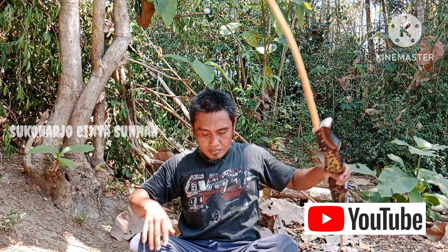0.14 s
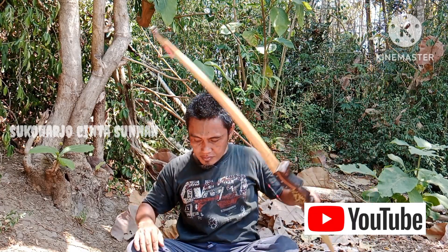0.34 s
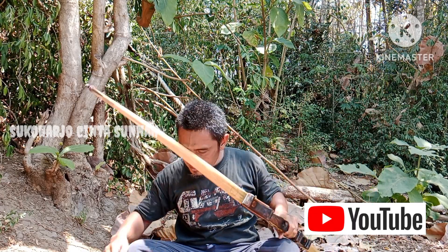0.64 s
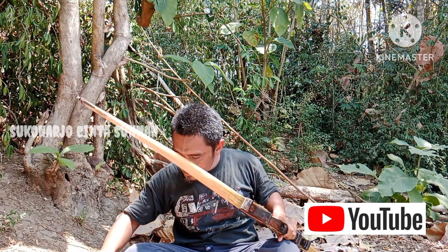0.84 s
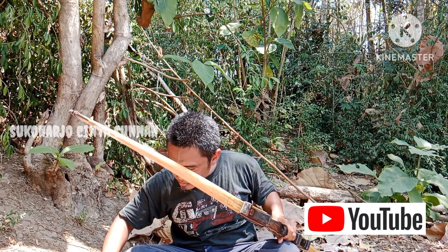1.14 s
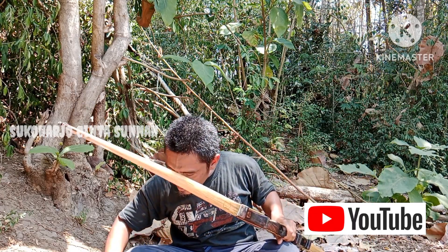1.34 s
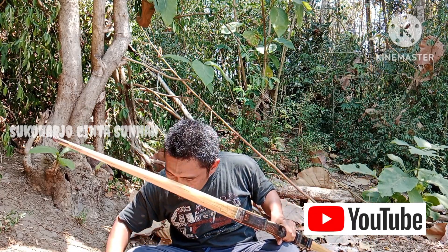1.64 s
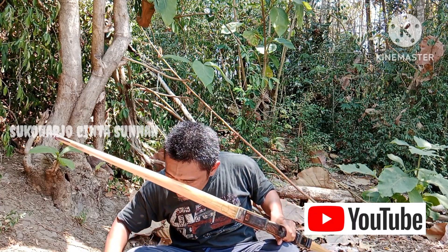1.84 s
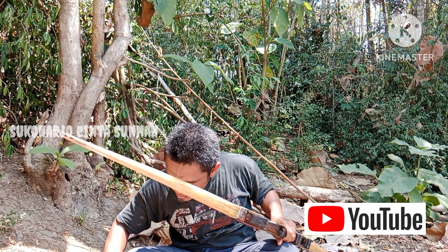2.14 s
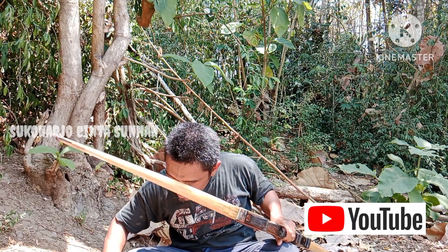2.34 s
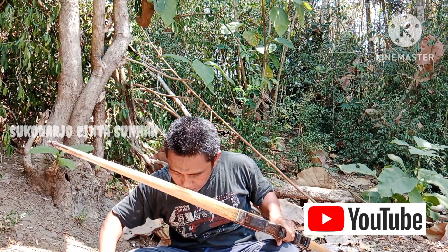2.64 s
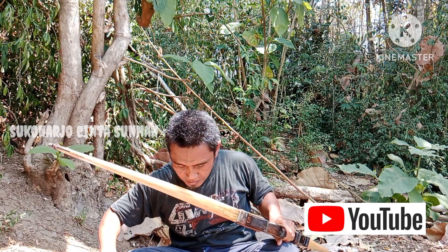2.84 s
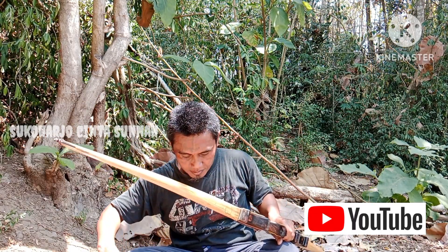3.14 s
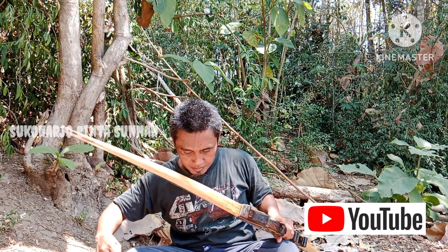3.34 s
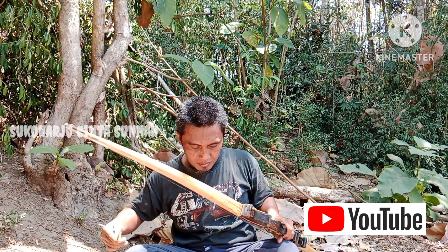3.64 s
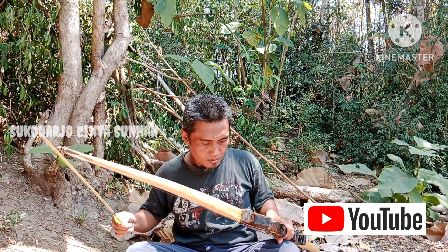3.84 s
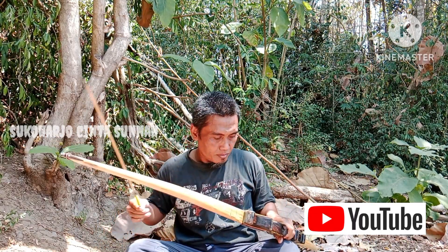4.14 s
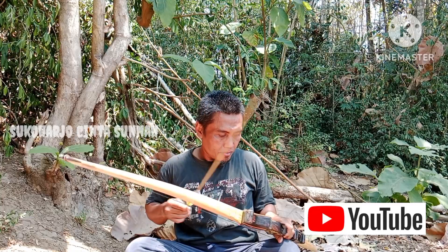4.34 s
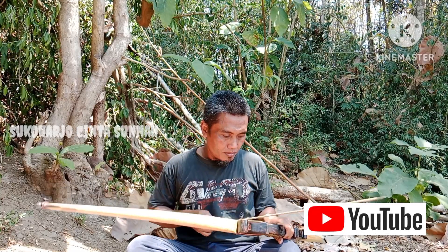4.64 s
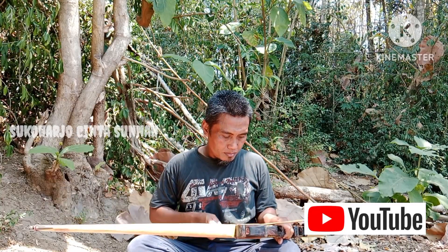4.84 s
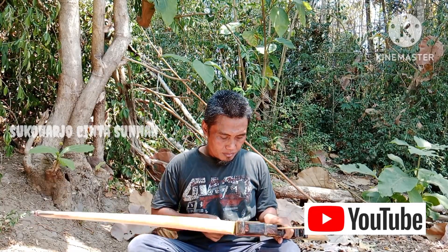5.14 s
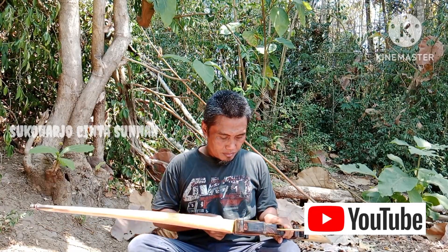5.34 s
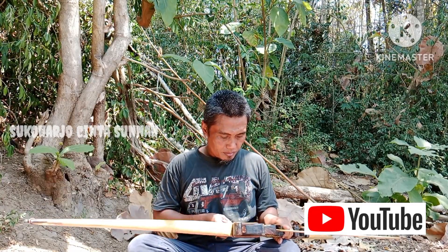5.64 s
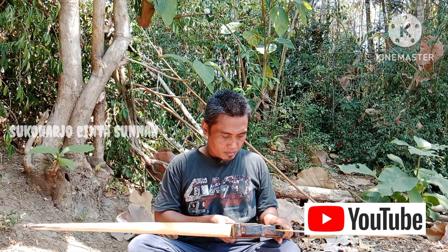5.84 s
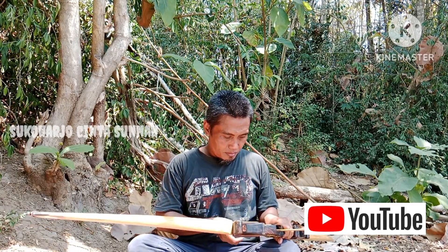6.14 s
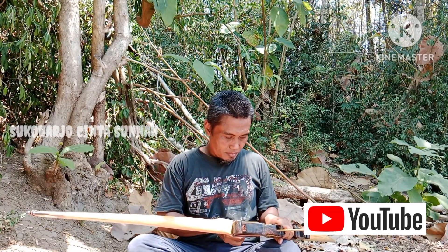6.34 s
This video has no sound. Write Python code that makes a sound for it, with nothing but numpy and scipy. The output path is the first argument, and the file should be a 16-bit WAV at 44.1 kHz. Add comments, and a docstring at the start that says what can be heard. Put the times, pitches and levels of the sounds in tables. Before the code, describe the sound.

A quiet outdoor hush runs throughout, with a faint far motor hum and light puffs of air on the microphone. In the first half second a wooden bow squeaks thinly, a sleeve brushes and far birds whistle. Tiny twig ticks follow. A nearer bird chirps at about 1.2 seconds, while a distant one pipes faintly until 3. From 1.5 to 2.6 seconds dry leaves rustle and crackle, and an arrow knocks lightly on the ground. Soft low thumps reach the microphone near 2, 3.2 and 5.7 seconds. At 3.9 seconds the shaft snaps sharply against the bow, the loudest sound, echoing briefly off the trees. It slides softly along the wood, then from 4.7 to 5.5 seconds bounces in about seven quickening taps that soften at the end, the wood and string ringing faintly. The bird chirps again around 6.3 seconds.

```python
"""Bow and arrow at a forest edge

Someone seated lowers a wooden bow, with small squeaks and a brush of sleeve, and picks an arrow out
of dry leaves. The shaft snaps sharply against the bow, then bounces on it in quickening, softening
taps that set the wood and string ringing and echo off the trees. Birds call, a far motor hums, and
low thumps and light puffs of air reach the microphone."""
import sys
import numpy as np
from scipy import signal
from scipy.fft import rfft, irfft, next_fast_len
from scipy.io import wavfile
from scipy.ndimage import uniform_filter1d, map_coordinates

SR = 44100
rng = np.random.default_rng(int(sys.argv[2]) if len(sys.argv) > 2 else 0)


def transcribe(u):
    """Save the signal u as a 16-bit wav file named by the first command-line argument.

    u: samples, shape (n,) or (channels, n), limited to [-1, 1]; the rate is SR.
    q: integer samples, one column per channel.
    """
    v = np.clip(np.atleast_2d(u).T, -1, 1)
    q = np.round(v * 32767).astype(np.int16)
    wavfile.write(sys.argv[1], SR, q)


N = 286650
TIME = np.arange(N) / SR  # seconds into the scene
AGE = np.arange(SR // 3) / SR  # seconds into one short sound
TOP_HZ = 15600  # the highest frequency heard


def amp(db):
    """Turn decibels into a gain to multiply by."""
    return 10 ** (np.asarray(db) / 20)


def unit(x):
    """Scale a sound to an average (rms) level of 1."""
    return x / np.sqrt(np.mean(x ** 2) + 1e-20)


def along(points, hz):
    """Read between (freq_hz, value) points, spacing octaves evenly."""
    freqs, values = np.transpose(points)
    return np.interp(np.log(hz + 1), np.log(freqs + 1), values)


def wobble(rate, size=N):
    """A smooth curve through `rate` random values a second."""
    knots = rng.standard_normal(int(size * rate / SR) + 4)
    grid = np.arange(0, len(knots) - 1, 1 / 8)
    return np.interp(TIME[:size] * rate, grid, map_coordinates(knots, [grid]))


def filtered(x, response):
    """Multiply each frequency in a sound by response(hz)."""
    size = next_fast_len(len(x) + 8192)
    return irfft(rfft(x, size) * response(np.fft.rfftfreq(size, 1 / SR)), size)[:len(x)]


def coloured(x, spectrum):
    """Shape a sound's tone with (freq_hz, level_db) points."""
    return filtered(x, lambda hz: amp(along(spectrum, hz)))


def passed(x, kind, edge_hz, order):
    """Let the 'low', 'high' or middle 'band' part of a sound through."""
    return signal.sosfilt(signal.butter(order, edge_hz, kind, fs=SR, output='sos'), x)


def noise(spectrum):
    """Steady noise with the given tone."""
    return unit(coloured(rng.standard_normal(N), spectrum))


def add(track, start_s, sound):
    """Mix a sound into a track."""
    part = track[max(round(start_s * SR), 0):][:len(sound)]
    part += sound[:len(part)]


def fade(fade_s):
    """Die away by 60 dB in fade_s seconds."""
    return np.exp(-np.log(1000) * AGE / fade_s)


def swell(rise_s):
    """Soften the start of a short sound."""
    return 1 - np.exp(-AGE / rise_s)


def strokes(rows):
    """The loudness of movements that rise, hold and die away."""
    out = np.zeros(N)
    for start_s, rise_s, hold_s, db, fade_s in rows:
        dying_s = np.maximum(TIME - start_s - rise_s - hold_s, 0)
        out += amp(db - 60 * dying_s / fade_s) * np.clip((TIME - start_s) / rise_s, 0, 1)
    return out


def crack(low_hz, high_hz, fade_s):
    """A dying burst of noise between two frequencies."""
    edges_hz = [low_hz, min(high_hz, SR / 2.2)]
    return unit(passed(rng.standard_normal(len(AGE)), 'band', edges_hz, order=2)) * fade(fade_s)


def ring(modes, spread_db, blur, contacts=((0, 0),)):
    """An object's own tones (modes), struck at each (delay_s, level_db); a loose grip blurs them."""
    chance = rng.standard_normal((len(modes), 2))
    drift = blur * np.cumsum(rng.standard_normal((len(modes), len(AGE))), axis=1) / np.sqrt(SR)
    out = np.zeros(len(AGE))
    for (hz, db, fade_s), (strength, phase), wander in zip(modes, chance, drift):
        energy = sum((AGE >= s) * (amp(push_db) * np.interp(AGE - s, AGE, fade(fade_s))) ** 2
                     for s, push_db in contacts)
        tone = np.sin(2 * np.pi * (hz * AGE + phase + wander))
        out += amp(db + spread_db * strength) * np.sqrt(energy) * tone
    return out / np.linalg.norm([amp(db) for hz, db, fade_s in modes])


def resonant(catches, modes):
    """An object rings under a stream of tiny catches."""
    return unit(signal.fftconvolve(catches, ring(modes, spread_db=-5.5, blur=0.9))[:N])


def grit(spectrum, rate, spread_db, patchy_db):
    """Rubbing: `rate` tiny catches a second, each with its own size and tone."""
    catches = (rng.random(N) < rate / SR) * rng.standard_normal(N)
    catches *= amp(spread_db * np.clip(rng.standard_normal(N), -2, 2))
    slices = signal.stft(catches, nperseg=256)[2]
    patches = uniform_filter1d(rng.standard_normal(slices.shape), size=3, axis=0)
    patches = unit(uniform_filter1d(patches, size=3, axis=1))
    catches = signal.istft(slices * amp(patchy_db * patches), nperseg=256)[1][:N]
    return unit(coloured(catches, spectrum))


# how long the forest echoes at depth 1: freq_hz, fade_s
ECHO_FADES = [(300, 0.42), (1000, 0.45), (4000, 0.33), (8000, 0.6), (14000, 0.29)]
def forest(x, depth):
    """Trunks and leaves return an echo that lasts longer for sounds deeper in the trees."""
    hz, seconds, slices = signal.stft(rng.standard_normal(SR), SR, nperseg=256)
    fade_s = depth * along(ECHO_FADES, hz)[:, None]
    tail = signal.istft(slices * np.exp(-np.log(1000) * seconds / fade_s), SR, nperseg=256)[1]
    tail *= 1 - np.exp(-np.arange(len(tail)) / SR / 0.011)
    return signal.fftconvolve(x, tail / np.linalg.norm(tail))[:N]


def scattered(x, spread_hz, depth):
    """A forest echo with its pitches smeared."""
    return forest(x * unit(wobble(spread_hz)), depth)


# tone of the open air: freq_hz, level_db
AIR_TONE = [(18, -38.5), (35, -15), (60, -5), (150, -9), (240, -12), (400, -16.5), (570, -18.5),
            (1300, -23), (1900, -27), (4000, -32), (7400, -37), (8500, -35.5), (10200, -41), (16000, -35.5)]
def air():
    """A steady outdoor hush."""
    return amp(-69.5) * noise(AIR_TONE) * amp(0.26 * wobble(5.7))


# how the motor swells and sinks: time_s, level_db
MOTOR_LEVELS = [(0, -85.5), (1.0, -70.5), (2.0, -76), (2.4, -65), (2.8, -69.5), (3.8, -66.5), (4.6, -70.5),
                (6.5, -74.5)]
# tone of its hum: freq_hz, level_db
MOTOR_TONE = [(70, -42), (100, -4), (118, 5), (142, -6.5), (170, -1), (200, -10.5), (300, -40),
              (500, -90.5)]
def motor():
    """A far motor hums low and unevenly."""
    times_s, levels_db = np.transpose(MOTOR_LEVELS)
    return amp(np.interp(TIME, times_s, levels_db)) * noise(MOTOR_TONE) * amp(1.7 * wobble(6.6))


# squeaks of the bow: start_s, length_s, level_db, pitch_hz
SQUEAKS = [(.003, 0.037, -68.5, 3460), (.048, 0.043, -74, 3450), (0.172, 0.018, -64, 3420),
           (0.199, 0.012, -61, 3440), (0.221, 0.033, -63.5, 3400), (0.299, 0.022, -70, 3450),
           (0.384, 0.018, -59.5, 3430), (0.408, 0.017, -61.5, 3390)]
# tones in a squeak, moved together so the first lands on its pitch: freq_hz, level_db
SQUEAK_TONES = [(3440, 5.5), (4250, -20), (7500, -30), (8500, -23)]
def squeaks():
    """The bow squeaks thinly as it is lowered, and the trees answer."""
    out = np.zeros(N)
    for start_s, length_s, db, pitch_hz in SQUEAKS:
        count = int(length_s * SR)
        speed = (1 + 0.0069 * wobble(147, count)) * pitch_hz / SQUEAK_TONES[0][0]
        clock = np.cumsum(speed) / SR
        tones = sum(amp(tone_db) * np.sin(2 * np.pi * hz * clock) for hz, tone_db in SQUEAK_TONES)
        add(out, start_s, amp(db) * signal.windows.tukey(count, 0.6) * tones)
    return out + amp(-9) * scattered(out, spread_hz=110, depth=1)


# tone of swirling air: freq_hz, level_db
WIND_TONE = [(20, -28.5), (35, -7), (60, -1), (100, -1.5), (130, -5), (170, -24.5), (260, -41),
             (480, -91.5)]
# puffs of air: start_s, rise_s, hold_s, level_db, fade_s, top_hz
PUFFS = [(0.019, 0.02, 0.039, -54, 0.26, 82), (0.249, 0.017, 0.234, -59, 0.18, 80),
         (1.356, 0.027, 0.058, -58, 0.27, 68.5), (1.63, 0.018, .02, -56.5, 0.16, 79.7),
         (2.397, 0.027, .02, -56, 0.6, 142), (2.846, 0.029, 0.033, -50.5, 0.44, 78),
         (3.15, 0.014, 0.028, -42.5, 0.2, 81), (4.713, 0.029, 0.009, -53, 1.0, 99.7),
         (4.999, 0.12, 0.036, -48, 0.31, 132.6), (5.306, 0.031, 0.27, -54, 0.62, 103),
         (5.804, 0.037, 0.212, -51.5, 0.41, 122), (6.378, 0.026, 0.031, -48.5, 0.44, 78.8)]
def breeze():
    """Air buffets the microphone lightly, with stronger puffs now and then."""
    swirls = unit(noise(WIND_TONE) * amp(1.9 * wobble(18)))
    out = amp(-74) * swirls
    for *puff, top_hz in PUFFS:
        out += strokes([puff]) * unit(passed(swirls, 'low', top_hz, order=3))
    return out


def whistle(length_s, start_hz, end_hz, waver):
    """One gliding, wavering bird note."""
    count = int(length_s * SR)
    pitch_hz = np.linspace(start_hz, end_hz, count) * (1 + waver * wobble(169, count))
    return signal.windows.tukey(count, 0.4) * np.sin(2 * np.pi * np.cumsum(pitch_hz) / SR)


# notes of far birds: start_s, length_s, pitch_hz, level_db
FAR_NOTES = [(0.093, 0.078, 2436, -68.5), (0.178, 0.09, 2360, -69), (0.247, 0.17, 1930, -71),
             (0.318, 0.14, 2400, -71.5), (0.333, 0.031, 1518, -67.5), (0.462, 0.035, 1540, -65.5)]
def far_birds():
    """Far birds whistle, blurred by their echo."""
    out = np.zeros(N)
    for start_s, length_s, hz, db in FAR_NOTES:
        add(out, start_s, amp(db) * whistle(length_s, hz, hz, waver=0.031))
    return amp(-2) * out + amp(-2.5) * scattered(out, spread_hz=200, depth=0.72)


# dry ticks of one twig: start_s, level_db
TICKS = [(0.098, -58.5), (0.237, -63.5), (0.424, -55), (.616, -61), (0.857, -61), (1.0, -64.5),
         (1.246, -60.5), (1.394, -63.5), (1.648, -61)]
# tones of the twig: pitch_hz, level_db, fade_s
TWIG_MODES = [(5500, -10, 0.099), (5800, -9, 0.11), (6600, 1, 0.08), (8470, -6, 0.073)]
def twig():
    """Light touches ring the same few high tones in a twig."""
    out = np.zeros(N)
    for start_s, db in TICKS:
        tick = amp(-6) * ring(TWIG_MODES, spread_db=5.5, blur=2)
        tick += amp(-1) * crack(3200, 7900, fade_s=0.019)
        add(out, start_s, amp(db) * tick * swell(0.0017))
    return out


# brushing movements: start_s, rise_s, hold_s, level_db, fade_s
SWISHES = [(.1, 0.13, 0.024, -70.5, 0.53), (.35, 0.063, .01, -72, 0.16),
           (2.125, 0.014, 0.047, -71.5, 0.099)]
# tone of the cloth: freq_hz, level_db
CLOTH_TONE = [(900, -18), (1400, 11), (2400, -3), (3000, 12), (4200, -3), (6000, 3), (7500, 2), (9500, -17),
              (12000, -2), (14000, -13)]
# thin tones of the rubbed grip: pitch_hz, level_db, fade_s
GRIP_MODES = [(4320, -10.5, .02), (7470, -5, 0.015), (12000, -1.5, 0.0045)]
def sleeve_and_grip():
    """The sleeve swishes and the rubbed grip hisses."""
    movement = strokes(SWISHES) * amp(3.2 * wobble(58.7))
    cloth = amp(-7) * noise(CLOTH_TONE)
    grip = amp(-4.5) * resonant(rng.standard_normal(N), GRIP_MODES)
    return movement * (cloth + grip)


def bump(hz, width_s):
    """A short, low swing of pressure that peaks halfway through."""
    from_peak_s = AGE - AGE.mean()
    return np.exp(-(from_peak_s / width_s) ** 2) * np.cos(2 * np.pi * hz * from_peak_s)


# soft bumps: peak_s, level_db, pitch_hz, half_length_s
THUMPS = [(0.427, -39.5, 77, 0.0072), (2.031, -31.5, 103, 0.0082), (2.418, -37, 84, 0.0091),
          (3.161, -30, 103, 0.0061), (3.91, -55.5, 158, 0.023), (5.705, -32, 83.9, 0.014),
          (5.765, -53, 165.6, 0.032), (6.19, -39, 77, 0.0081)]
def thumps():
    """Bumps at the microphone; hard ones also knock an octave up, then swing back lower and slower."""
    out = np.zeros(N)
    for peak_s, db, hz, width_s in THUMPS:
        start_s, strength = peak_s - AGE.mean(), amp(db)
        octave = amp(9) * strength ** 2 * bump(2 * hz, width_s / 2)
        rebound = amp(24) * strength ** 2 * bump(hz * 0.51, width_s / 0.51)
        add(out, start_s, strength * bump(hz, width_s) + octave)
        add(out, start_s + 0.02, rebound)
    return out


# notes of a distant bird: start_s, level_db
PIPING = [(.985, -67.5), (1.14, -74), (1.31, -80), (1.47, -77), (1.65, -79), (1.87, -69.5), (2.068, -68),
          (2.171, -72), (2.459, -79), (2.69, -71.5), (2.92, -77)]
def piping_bird(first_hz=1485, sink_hz_per_s=27, length_s=0.08):
    """A bird repeats one slowly sinking note, heard mostly as echo."""
    out = np.zeros(N)
    for start_s, db in PIPING:
        hz = first_hz - sink_hz_per_s * (start_s - PIPING[0][0])
        add(out, start_s, amp(db) * whistle(length_s, hz, hz, waver=0.0065))
    return amp(-9) * out + amp(-2.5) * scattered(out, spread_hz=60, depth=0.79)


# chirps of the nearer bird: start_s, length_s, start_hz, end_hz, level_db
CHIRPS = [(1.015, 0.058, 3350, 2960, -70.5), (1.151, 0.024, 2630, 2700, -54),
          (1.173, 0.024, 2666, 2910, -54.5), (1.197, 0.02, 2830, 2840, -57),
          (1.236, 0.047, 2853, 2726, -59), (1.268, 0.019, 2675, 2890, -57), (1.286, 0.036, 2960, 2905, -51),
          (1.311, 0.03, 2920, 2854, -53.5), (1.315, 0.018, 2750, 2550, -57.5),
          (1.353, 0.026, 2877, 2913, -57), (1.389, 0.04, 2905, 2890, -58), (6.223, 0.06, 2910, 3260, -66.5),
          (6.366, 0.04, 2730, 2596, -61), (6.393, 0.02, 2650, 2763, -55.5),
          (6.42, 0.021, 2765, 2810, -65.5), (6.486, .03, 2750, 2750, -64)]
def near_bird():
    """A bird chirps in the trees; a fast flutter in loudness makes it raspy."""
    out = np.zeros(N)
    for start_s, length_s, start_hz, end_hz, db in CHIRPS:
        add(out, start_s, amp(db) * whistle(length_s, start_hz, end_hz, waver=0.011))
    out *= unit(amp(2.5 * wobble(450)))
    return amp(-2.5) * out + amp(-6.5) * scattered(out, spread_hz=190, depth=0.78)


# sweeps through fallen leaves: start_s, rise_s, hold_s, level_db, fade_s
SWEEPS = [(1.54, 0.0091, 0.0093, -67, 0.25), (1.715, 0.0097, 0.0082, -68, 0.22),
          (1.785, 0.03, .02, -63, 0.19), (1.82, 0.014, 0.035, -53.5, 0.21),
          (1.868, 0.0092, 0.041, -59.5, 0.13), (1.98, 0.034, 0.0072, -59.5, 0.062),
          (2.215, 0.0079, 0.006, -56.5, 0.12)]
# tone of the rustle: freq_hz, level_db
LEAF_TONE = [(300, -34), (600, -25), (750, 17), (950, -14), (1200, 4), (2300, -3.5), (3200, -2), (4600, -3),
             (7200, -2), (9000, -5.5), (15000, -4)]
# tones of crackling leaves: pitch_hz, level_db, fade_s
LEAF_MODES = [(1245, -8, 0.085), (1500, -5, 0.07), (3040, 3, 0.056), (3130, 4, 0.038), (4070, -7, .06),
              (7200, 2, 0.055), (7950, -2, 0.053), (8000, 0, 0.056)]
def rustle():
    """Hand and arrow sweep through dry leaves, which catch and crackle."""
    catches = unit(grit(LEAF_TONE, rate=3500, spread_db=2, patchy_db=4) * amp(1.1 * wobble(150)))
    return strokes(SWEEPS) * (amp(-2) * catches + amp(-9.5) * resonant(catches, LEAF_MODES))


# dry leaves breaking: start_s, level_db, centre_hz
BREAKS = [(1.559, -57.5, 5850), (1.7098, -41.5, 7680), (1.793, -61, 5440), (1.8208, -48, 6960),
          (1.832, -44, 5500), (1.8440, -38.5, 6550), (1.844, -42.5, 3050), (1.898, -50, 6900),
          (1.951, -54, 7500), (1.967, -46.5, 7950), (2.029, -55, 8020), (2.432, -56, 8060),
          (3.357, -56.5, 3320)]
def breaking_leaves():
    """Leaves flick, ring and crumble; a firm break is crisp, a gentle one swells and rings more."""
    out = np.zeros(N)
    for start_s, db, hz in BREAKS:
        modes = [(hz * 0.95, -3, 0.06), (hz * 1.04, 0, 0.08), (hz * 2, -6, 0.06)]
        blade = ring(modes, spread_db=6.5, blur=1.3)
        crumble = crack(hz / 1.8, hz * 1.15, fade_s=0.07) * amp(3.1 * wobble(600, len(AGE)))
        flick = crack(hz, hz * 1.48, fade_s=0.0068)
        softness = amp(np.clip(-57.5 - db, -30, 3))
        body = amp(-12.5) * (1 + softness) * blade + amp(-12) / (1 + softness) * crumble
        add(out, start_s, amp(db) * (flick + body) * swell(0.00096 * softness))
    return out


# scuffs of the hand: start_s, rise_s, hold_s, level_db, fade_s
SCUFFS = [(1.83, 0.022, 0.039, -79, .15), (1.975, 0.034, 0.035, -59, 0.13)]
# tone of the soil: freq_hz, level_db
SOIL_TONE = [(120, -17), (220, -1), (330, -5), (520, -1), (700, 2.5), (950, -20), (1300, -11), (2200, -29),
             (5000, -45)]
def soil_scuffs():
    """The hand scuffs dully on the soil under the leaves."""
    return strokes(SCUFFS) * noise(SOIL_TONE) * amp(1.9 * wobble(98))


def blows(events, modes, main_db, main_fade_s, crack_db, rise_s, bounce_s, bounce_db):
    """Wood touches twice per blow; the spot that is hit brings out two tones."""
    out = np.zeros(N)
    for start_s, db, body_db, bright_db, main_hz, second_hz, second_db in events:
        wood = ring(modes, spread_db=2.96, blur=1, contacts=[(0, 0), (bounce_s, bounce_db)])
        wood += amp(crack_db) * crack(850, 10400, fade_s=0.076)
        treble = [(6500, bright_db), (9000, bright_db), (12000, bright_db - 2.5)]
        wood = coloured(wood * swell(rise_s), [(1100, body_db), (2000, 0.0062)] + treble)
        tones = ring([(main_hz, 0, main_fade_s)], spread_db=2.5, blur=1.25)
        tones += amp(second_db) * ring([(second_hz, 0, main_fade_s)], spread_db=3, blur=1.76)
        add(out, start_s, amp(db) * (wood + amp(main_db) * tones * swell(0.0016)))
    return out


# knocks on the ground: start_s, level_db, body_db, bright_db, main_hz, second_hz, second_db
KNOCKS = [(1.845, -57.5, 18, 6, 760, 3200, 1), (1.994, -41.5, 3, -1.5, 700, 1289, -3.5),
          (2.012, -40.5, 6, -12, 698, 2520, -8.5), (2.2235, -37, 7.5, -2, 732, 3300, -9),
          (2.387, -45.5, -1, 4, 3880, 2660, -3), (2.418, -59.5, -6, 15, 4040, 1640, 3),
          (2.615, -64.5, -10, 6, 4210, 1650, 1)]
# tones of the shaft lying on soil: pitch_hz, level_db, fade_s
GROUNDED_MODES = [(685, -7, 0.084), (751, -16, 0.11), (1260, -3, 0.059), (2130, -13, 0.082),
                  (2750, -1, 0.016), (3240, 4, 0.031), (4080, 1, 0.044), (4280, -4, 0.029),
                  (6300, -14, 0.09), (8280, -15, 0.11)]
def ground_knocks():
    """The arrow knocks on the ground as it is picked up."""
    return blows(KNOCKS, GROUNDED_MODES, main_db=-4.5, main_fade_s=0.064, crack_db=-11.5,
                 rise_s=0.0075, bounce_s=0.0017, bounce_db=-19)


# soft touches on leaves: start_s, hold_s, level_db
TOUCHES = [(3.082, 0.0075, -74.5), (3.261, 0.0056, -68.5), (3.294, .008, -79.5), (3.348, 0.015, -76.5),
           (3.448, 0.0076, -68), (4.255, 0.0097, -69), (4.371, .04, -79), (6.173, .06, -76.5),
           (6.32, 0.027, -77.5)]
# tone of those touches: freq_hz, level_db
TOUCH_TONE = [(2500, -13), (7000, -10), (8500, 4), (9500, -2.5), (11000, -14), (14000, -1.5)]
def brushed_leaves():
    """Fingers and arrow brush softly past leaves."""
    movement = strokes([(start_s, 0.005, hold_s, db, 0.16) for start_s, hold_s, db in TOUCHES])
    return movement * noise(TOUCH_TONE) * amp(2.7 * wobble(250))


def bending(x, lag_s):
    """High tones run faster through bending wood: 2 kHz arrives lag_s after the very highest."""
    slowness = lag_s / (2000 ** -0.5 - TOP_HZ ** -0.5)
    return filtered(x, lambda hz: np.exp(-2j * np.pi * slowness * (2 * hz ** 0.5 - hz / TOP_HZ ** 0.5)))


# quick contacts within the snap: start_s, level_db, crack_db
SNAP_HITS = [(3.9236, -33.5, 3), (3.9252, -18, -10.5), (3.9304, -13, 0.5), (3.9312, -18.5, 4.5)]
# tones of bow and arrow struck hard together: pitch_hz, level_db, fade_s
BOW_MODES = [(785, -22, 0.14), (947, -26, .18), (1262, -27, .13), (1360, -27, .12), (1600, -25, 0.05),
             (1707, -27.5, .11), (1825, -26, 0.12), (2396, -8.5, 0.078), (2524, -14, .04),
             (2985, -6, 0.046), (3160, -9.5, 0.034), (3600, -7, .036), (3725, -0.5, .04),
             (3987, -2.5, 0.037), (4337, -8, 0.04), (4585, -13.5, 0.04), (4902, -12, .03),
             (5129, -7.5, .036), (7078, -13, .028), (7928, -14, .035), (8230, -13, 0.028),
             (8640, -8, 0.033)]
def arrow_snap():
    """The shaft chatters against the bow for a few milliseconds and both ring."""
    out, start_s = np.zeros(N), SNAP_HITS[0][0]
    contacts = [(hit_s - start_s, db) for hit_s, db, _ in SNAP_HITS]
    add(out, start_s, amp(-2) * ring(BOW_MODES, spread_db=-1.5, blur=0.4, contacts=contacts))
    for hit_s, db, crack_db in SNAP_HITS:
        add(out, hit_s, amp(db + crack_db - 1.5) * crack(3000, 9000, fade_s=0.0053))
        add(out, hit_s, amp(db - 27) * crack(940, 13000, fade_s=0.11))
    # the bow's woody body swells, then dies unevenly
    body = crack(510, 1100, fade_s=0.15) * swell(0.026) * amp(2.5 * wobble(240, len(AGE)))
    add(out, start_s, amp(-43) * body)
    return passed(bending(out, lag_s=0.0008), 'high', 560, order=4)  # thin wood gives almost no bass


# bounces on the bow: start_s, level_db, body_db, bright_db, main_hz, second_hz, second_db
TAPS = [(4.1, -59, -17, 2, 4470, 9000, -6.5), (4.6934, -37, -6, 0.5, 2840, 1134, -2.5),
        (4.896, -33, -5.5, 2, 4300, 2040, -5.5), (5.0606, -31.5, -10.5, -1, 3017, 3680, -5),
        (5.2114, -36, -8, -6.5, 1910, 2985, -9), (5.3393, -34, -17.5, -3.5, 1977, 2056, -9),
        (5.424, -39.5, -25, -20.5, 1985, 3460, -14), (5.4883, -49.5, -9, -28, 1965, 1700, -11)]
# tones of the lightly held shaft: pitch_hz, level_db, fade_s
SHAFT_MODES = [(809, -17, 0.15), (1040, -23, 0.11), (1385, -13, 0.1), (1650, -7, 0.08), (1830, -7, 0.13),
               (1975, -4.5, 0.09), (2110, -2, 0.045), (2270, -10, 0.06), (2530, -15, .1), (2740, -11, 0.08),
               (2980, -8, 0.06), (3520, -6, 0.045), (3690, -2, 0.06), (4100, -2.5, 0.04), (4400, -5, .04),
               (4580, -4, 0.045), (4760, -7, 0.04), (5380, -7, 0.03), (5620, -9, .03), (6450, -7, 0.027),
               (6660, -1, 0.04), (7080, -8, .03), (7820, -4, 0.03), (8130, -7.5, 0.03), (8580, -4.5, 0.033),
               (9450, -11, .025)]
def arrow_taps():
    """The shaft bounces on the bow; the last, soft taps lose their treble."""
    taps = blows(TAPS, SHAFT_MODES, main_db=0, main_fade_s=0.047, crack_db=-8,
                 rise_s=0.00067, bounce_s=0.008, bounce_db=-34)
    return bending(taps, lag_s=0.0012)


# tones of the tight string: pitch_hz, level_db, fade_s
STRING_MODES = [(1820, -4, 0.32), (1940, -2, .25), (2160, -3.5, 0.22), (2370, -1, 0.2), (3605, 2, 0.36),
                (3720, 1, 0.2), (4050, 0.5, 0.38), (4423, -2.5, 0.32), (5140, -4, .22), (5884, -5.5, 0.36),
                (7050, -5.5, 0.23), (7840, -3, 0.51), (8400, -4, 0.26)]
def bowstring():
    """The snap and every tap set the string singing faintly."""
    out = np.zeros(N)
    hits = [(SNAP_HITS[-1][0], -47)] + [(start_s, db - 33.5) for start_s, db, *_ in TAPS]
    for start_s, db in hits:
        add(out, start_s, amp(db) * ring(STRING_MODES, spread_db=2, blur=1.8) * swell(0.01))
    return out


def leaf_echo(x):
    """Near leaves scatter back a rough, bright shimmer."""
    shimmer = scattered(x, spread_hz=740, depth=0.55) * amp(2 * wobble(150))
    return passed(shimmer, 'high', 7500, order=4)


def trunk_echo(x, delay_s):
    """Trunks some way off throw back a late, blurred copy of the middle treble."""
    out = np.zeros(N)
    tone = [(1000, -10), (2600, -13), (4400, 9.5), (6500, -10), (9000, -5)]  # freq_hz, level_db
    add(out, delay_s, coloured(forest(x, depth=0.5), tone))
    return out


# slides along the bow: start_s, rise_s, hold_s, level_db, fade_s
SLIDES = [(4.53, 0.021, 0.19, -74, 0.5), (4.74, 0.11, 0.029, -67.5, 0.11)]
# tone of rubbed wood grain: freq_hz, level_db
GRAIN_TONE = [(900, -25), (1500, 7), (1950, 5.5), (2500, -12), (3800, -7), (5000, 1), (6000, -0.5),
              (7500, -1.5), (9400, 8.5), (10700, -2), (14000, 0)]
# snags on the wood: start_s, level_db, centre_hz
SNAGS = [(4.539, -66.5, 8350), (4.5967, -62, 5240), (4.794, -75, 4860), (4.8558, -69.5, 7900),
         (4.887, -53.5, 8300)]
def arrow_slide():
    """The shaft slides along the bow, catching on the wood and ringing itself and the string."""
    catches = unit(grit(GRAIN_TONE, rate=5000, spread_db=3, patchy_db=6) * amp(2.3 * wobble(56)))
    ringing = amp(-2.5) * resonant(catches, SHAFT_MODES) + amp(-6) * resonant(catches, STRING_MODES)
    out = strokes(SLIDES) * (amp(-2.5) * catches + ringing)
    for start_s, db, hz in SNAGS:
        snag = crack(hz / 1.5, hz * 1.06, fade_s=0.024) * amp(3 * wobble(500, len(AGE)))
        snag += amp(-4) * ring([(hz, 0, 0.07)], spread_db=-3, blur=3)
        add(out, start_s, amp(db) * snag * swell(0.00092))
    return out


def scene():
    """Mix the near sounds, their echoes from bushes and trees, the birds and the air."""
    snap, taps = arrow_snap(), arrow_taps()
    small = taps + ground_knocks() + twig()
    small += rustle() + breaking_leaves() + soil_scuffs() + brushed_leaves()
    echoes = scattered(amp(-13) * small + amp(-19) * snap, spread_hz=130, depth=0.29)  # close bushes
    echoes += amp(-21.5) * leaf_echo(snap)
    echoes += forest(amp(-29) * snap + amp(-32) * taps, depth=0.94)
    echoes += amp(-42) * trunk_echo(snap, delay_s=0.09) + amp(-40) * trunk_echo(snap, delay_s=0.15)
    handling = squeaks() + sleeve_and_grip() + arrow_slide()
    birds = far_birds() + piping_bird() + near_bird()
    background = air() + motor() + breeze() + thumps()
    return (snap + small + bowstring() + echoes + handling + birds + background)[None]


def record(dry):
    """The microphone weakens the lowest bass, dulls above 9 kHz and hears nothing above TOP_HZ."""
    tone = [(20, -11), (35, -11.5), (50, 0), (9000, 0), (11000, -7.5), (14000, -10.5), (15500, -15.5)]
    return filtered(dry[0], lambda hz: amp(along(tone, hz)) * (hz < TOP_HZ))[None]


dry = scene()
out = record(dry)
transcribe(out)
```